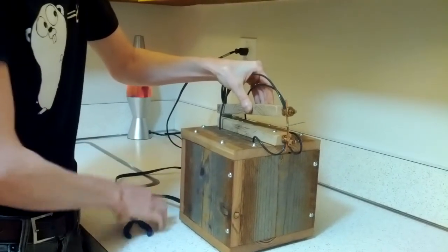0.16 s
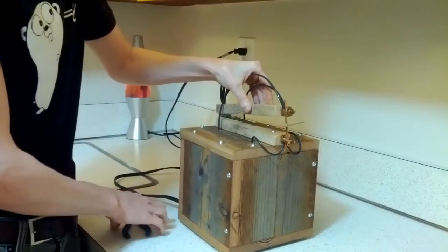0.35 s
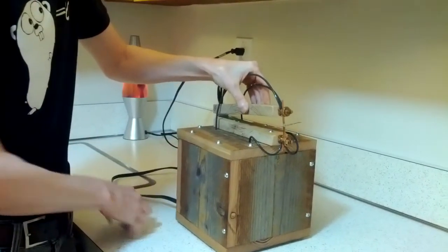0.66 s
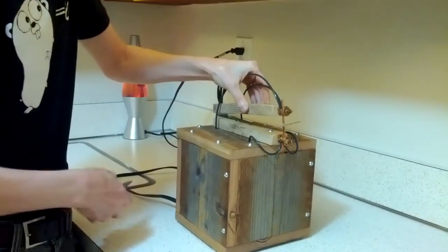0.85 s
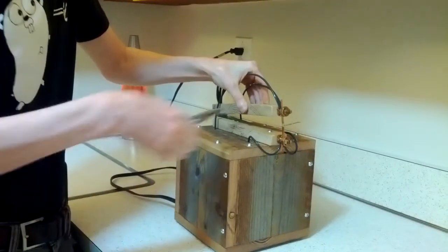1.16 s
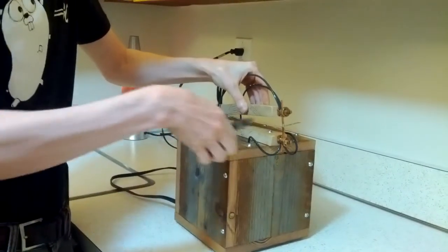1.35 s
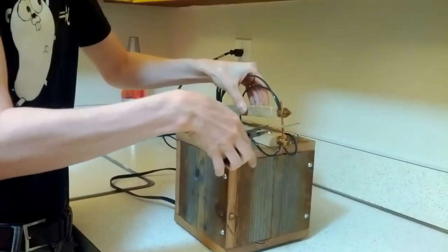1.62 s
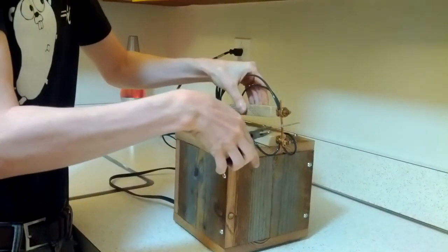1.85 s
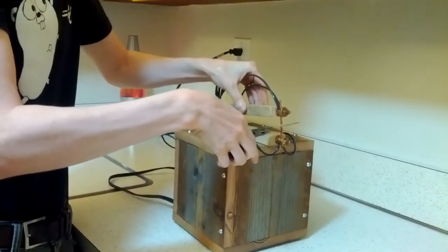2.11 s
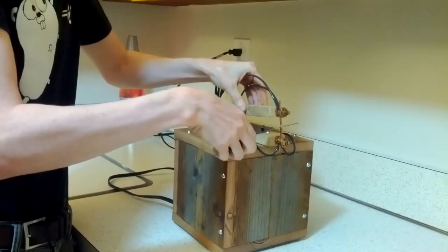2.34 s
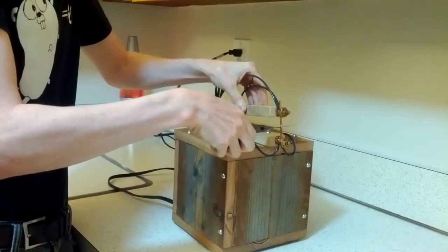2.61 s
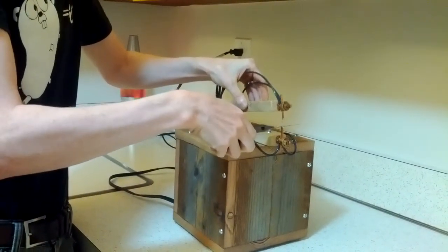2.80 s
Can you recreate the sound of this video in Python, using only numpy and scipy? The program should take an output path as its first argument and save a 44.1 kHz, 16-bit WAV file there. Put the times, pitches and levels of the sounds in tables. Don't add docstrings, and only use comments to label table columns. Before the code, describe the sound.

Sparse bright clicks of a hand tool in a small, quiet kitchen: a tick and scuff first, a crisp snap midway, metal rattling on wood later, soft thuds at the end, low hum and faint hiss throughout.

```python
import sys
import numpy as np
from scipy import signal
from scipy.fft import rfft, irfft
from scipy.io import wavfile
from scipy.ndimage import uniform_filter1d

SR = 44100
rng = np.random.default_rng(int(sys.argv[2]) if len(sys.argv) > 2 else 0)


def generate_wav(sig):
    pcm = np.round(np.clip(np.atleast_2d(sig).T, -1, 1) * 32767).astype(np.int16)
    wavfile.write(sys.argv[1], SR, pcm)


def convert_level_to_amplitude(level_db):
    exponent = np.asarray(level_db, float) / 20
    return 10 ** exponent


N = 130977

# frequency in Hz, density in dB per Hz.
AIR_COLOUR = [(15, -16), (70, -15.5), (170, -10.5), (450, -17.5), (1100, -22.5), (1800, -32), (6500, -43),
              (13000, -37)]
# frequency in Hz, width in Hz, level in dB.
ROOM_MODES = [(22.8, 3, -64), (90, 11, -65.5), (160.8, 14.5, -62.5), (181.1, 6.3, -62.5), (244.3, 22, -61),
              (273.1, 21.5, -64.5), (319.6, 80, -68), (465, 19.4, -64.5), (542, 26, -73),
              (644.7, 20, -73.5), (931, 43, -73), (1490, 45, -83.5)]
# frequency in Hz, rms level in dB.
HUM_TONES = [(120.5, -51), (50.8, -60.5)]
# multiple of the shaft rate, rms level in dB.
SHAFT_TONES = [(1, -62), (19, -83), (22, -74.5), (45, -88.5), (50, -90.5), (51, -99), (52, -96), (53, -95)]
# multiple of the slot rate, rms level in dB.
SLOT_TONES = [(6, -77.5), (7, -87.5), (8, -71), (9, -77.5)]
# start in seconds, length in seconds, rms level in dB.
SCUFF_STROKES = [
    (0.162, 0.058, -59.5),
    (0.304, 0.085, -60),
    (0.408, 0.049, -63),
    (0, 0.04, -61),
    (2.211, .03, -66),
    (2.788, 0.043, -83),
]
# frequency in Hz, gain in dB.
SCUFF_COLOUR = [(500, -2), (2200, 1), (4500, -5.5), (8000, -9), (14000, -4)]
# start in seconds, peak level in dB, centre in Hz, width in Hz.
TICK_EVENTS = [(0.1623, -34.5, 13300, 2530), (0.1623, -44, 7500, 3000), (0.169, -43, 13000, 1500),
               (0.184, -47.5, 14000, 3000), (0.214, -46, 12990, 3000), (0.18, -46, 4000, 1480),
               (0.334, -48, 7500, 3030), (0.75, -46, 7400, 2500), (0.7497, -47, 3200, 2500),
               (0.7555, -50, 7000, 2000), (0.758, -49, 3500, 2000), (1.4453, -37, 13200, 2980),
               (1.4451, -46.5, 7600, 2500), (1.4515, -44, 13000, 1200), (2.3022, -46.5, 4550, 2500),
               (1.483, -50, 13000, 4000), (2.7278, -37, 13200, 3000), (2.7281, -47.5, 8040, 2500),
               (2.734, -42, 14000, 2000), (2.766, -40, 13600, 4000)]
# peak level in dB, centre in Hz, width in Hz.
SNAP_LAYERS = [
    (-25, 11700, 2100),
    (-34.5, 7100, 2900),
    (-30.5, 3920, 1530),
]
# frequency in Hz, level in dB, 60 dB decay in seconds.
BOX_MODES = [(307, -4.5, 0.1), (330, 1, 0.072), (430, -12, 0.013), (551, -2.5, 0.024), (800, -7, .035),
             (1004, -5, 0.067), (1180, -6, 0.028), (1554, -4, 0.035), (1760, -11.5, 0.034),
             (2240, -11.5, 0.0698), (3000, -3.5, 0.02), (3400, -6.5, 0.017), (3890, -10.5, 0.011)]
# start in seconds, level in dB, best-rung frequency in Hz, spread in octaves.
BOX_KNOCKS = [
    (2.3185, -42.5, 740, 2.3),
    (2.3245, -40, 590, 2.75),
    (2.002, -52.5, 1500, 0.97),
    (3, -50.5, 1340, 0.86),
    (2.808, -50.5, 1000, 1.2),
    (0.1625, -52, 2240, .12),
    (0.178, -48, 2240, .2),
]
# start in seconds, peak level in dB, frequency in Hz,
# 60 dB decay in seconds.
COUNTER_THUDS = [
    (0.184, -40.5, 169.2, 0.2),
    (0.199, -38.5, 244, 0.087),
    (0.775, -38, 90, 0.13214),
    (0.808, -41, 90, 0.17),
    (1.443, -41.5, 85.78, 0.18),
    (2.794, -31, 120, 0.0731),
    (2.803, -39.5, 172, .1),
    (2.33, -47, 181.5, 1),
    (2.815, -37, 90, 0.174),
    (2.938, -36, 70, .12),
]
# frequency in Hz, level in dB, 60 dB decay in seconds.
STEEL_MODES = [(4200, -2, .005), (6530, -1, 0.011), (7560, -3.5, 0.0052), (8770, -3, 0.019),
               (9550, -3, .006), (10350, 0.5, .008), (11200, 0.5, 0.011), (12000, -3, 0.012),
               (12500, -2, 0.0082), (13200, -2, .006), (15000, -3, .008), (15200, -2, .009)]
# start in seconds, level in dB, best-rung frequency in Hz, spread in octaves.
STEEL_HITS_ON_TOOL = [
    (1.9935, -53, 11800, 0.33),
    (1.996, -53, 7300, 0.27),
    (2.3028, -44.5, 14300, 0.65),
    (2.3047, -41, 11800, 0.1),
    (2.3126, -55, 13050, .35),
    (2.3165, -52.5, 9600, .8),
    (2.323, -47.5, 9000, 0.24),
]
# frequency in Hz, 60 dB decay in seconds.
ECHO_DECAY = [(200, 0.23), (2000, 0.11), (6000, 0.17), (15000, 0.13)]
# delay in seconds, level in dB.
FIRST_REFLECTIONS = [(.0015, -31), (.0031, -16), (.0054, -18.5), (0.0104, -20)]


def evened(x):
    return x / np.sqrt(np.mean(x ** 2) + 1e-30)


def coloured(x, points):
    f, level_db = np.transpose(points)
    hz = np.fft.rfftfreq(len(x), 1 / SR)
    gain_db = np.interp(np.log(hz + 1), np.log(f + 1), level_db)
    return irfft(rfft(x) * convert_level_to_amplitude(gain_db), len(x))


def add(mix, s, sound):
    part = mix[round(s * SR):][:len(sound)]
    part += sound[:len(part)]


def drift(per_s):
    hz = np.fft.rfftfreq(N, 1 / SR)
    spectrum = rfft(rng.standard_normal(N)) / (1 + (hz / per_s) ** 2)
    return evened(irfft(spectrum, N))


def air():
    hz = np.fft.rfftfreq(N, 1 / SR)
    modes = 0
    for f, width, db in ROOM_MODES:
        modes = modes + convert_level_to_amplitude(db) ** 2 / (1 + (2 * (hz - f) / width) ** 2) ** 2 / width
    boom = irfft(rfft(rng.standard_normal(N)) * np.sqrt(modes * 2 * SR / np.pi), N)
    hiss = evened(coloured(rng.standard_normal(N), AIR_COLOUR))
    return convert_level_to_amplitude(-55) * hiss + boom


def tone(hz, db, wobble_db):
    level = np.sqrt(2) * convert_level_to_amplitude(db + wobble_db * drift(3.8))
    t = np.arange(N) / SR - 0.19
    return level * np.cos(2 * np.pi * hz * t)


def fridge():
    shaft_hz, slot_hz = 59.1, 1717
    slot_wander, slot_flutter_db = 0.0024, 3.5
    out = sum(tone(hz, db, 0.31) for hz, db in HUM_TONES)
    out = out + sum(tone(k * shaft_hz, db, 1.2) for k, db in SHAFT_TONES)
    turns = np.cumsum(slot_hz * (1 + slot_wander * drift(27.0))) / SR
    for k, db in SLOT_TONES:
        level = np.sqrt(2) * convert_level_to_amplitude(db + slot_flutter_db * drift(60.0))
        out = out + level * np.sin(2 * np.pi * k * turns)
    return out


def scuff(length, db):
    n = round(length * SR)
    slips_per_s = 2500
    slips = (rng.random(8000) < slips_per_s / SR) * rng.standard_normal(8000)
    stroke = np.sin(np.pi * (np.arange(n) / n) ** 0.55)
    return convert_level_to_amplitude(db) * evened(coloured(slips, SCUFF_COLOUR))[:n] * stroke


def tick(db, hz, width):
    t = np.arange(200) / SR
    shape = t * np.exp(-2 * np.pi * width * t) * np.sin(2 * np.pi * hz * t)
    return convert_level_to_amplitude(db) * shape / abs(shape).max()


def snap():
    return sum((-1) ** k * tick(*row) for k, row in enumerate(SNAP_LAYERS))


def struck(modes, contact_s, db, centre_hz, octaves):
    chatter, crack_db, crack_s = 3.9, 2, 0.0035
    hz, level_db, t60 = np.transpose(modes)[:, :, None]
    t = np.arange(8000) / SR
    luck = rng.standard_normal((len(modes), 2))
    shake = rng.standard_normal((len(modes), 600)) + 1j * rng.standard_normal((len(modes), 600))
    contact = (1 + chatter * shake) * np.exp(-t[:600] / contact_s)
    decay = np.exp(-np.log(1000) * t / np.clip(t60, .003, .1))
    swell = signal.fftconvolve(decay, contact, axes=1)[:, :len(t)]
    turns = hz * (1 + 0.0081 * luck[:, :1]) * t + luck[:, 1:]
    rings = (swell * np.exp(2j * np.pi * turns)).imag
    focus_db = level_db - np.minimum(10 * (np.log2(hz / centre_hz) / octaves) ** 2, 22.0)
    rung = (convert_level_to_amplitude(focus_db) * rings / abs(swell).max(axis=1, keepdims=True)).sum(axis=0)
    colour = [(hz[0, 0] / 2, -40), *zip(hz[:, 0], focus_db[:, 0]), (hz[-1, 0] * 2, -30)]
    crack = evened(coloured(rng.standard_normal(len(t)), colour)) * np.exp(-t / crack_s)
    return convert_level_to_amplitude(db) * (rung + convert_level_to_amplitude(crack_db + focus_db.max()) * crack)


def box_knock(db, centre_hz, octaves):
    return struck(BOX_MODES, 0.0015, db, centre_hz, octaves)


def thud(db, hz, t60):
    t = np.arange(12000) / SR
    rise_s = 0.0032
    return convert_level_to_amplitude(db - 60 * t / t60) * (1 - np.exp(-t / rise_s)) * np.sin(2 * np.pi * hz * t)


def steel_hit(db, centre_hz, octaves):
    return struck(STEEL_MODES, .0008, db, centre_hz, octaves)


def kitchen(x):
    hz, t, z = signal.stft(rng.standard_normal(SR // 2), SR, nperseg=128)
    f, t60 = np.transpose(ECHO_DECAY)
    fade = convert_level_to_amplitude(-60 * t / np.interp(hz, f, t60)[:, None])
    tail = signal.istft(z * fade, SR, nperseg=128)[1]
    tail = tail * np.minimum(np.arange(len(tail)) / (0.0021 * SR), 1)
    tail = convert_level_to_amplitude(-2) * tail / np.linalg.norm(tail)
    for s, db in FIRST_REFLECTIONS:
        add(tail, s, convert_level_to_amplitude(np.array([db])))
    return x + signal.fftconvolve(x, tail)[:N]


def below(x, edge_hz):
    return irfft(rfft(x) * (np.fft.rfftfreq(N, 1 / SR) < edge_hz), N)


def scene():
    hands, ticks, counter = np.zeros((3, N))
    for s, *row in SCUFF_STROKES:
        add(hands, s, scuff(*row))
    for s, *row in TICK_EVENTS:
        add(ticks, s, tick(*row))
    for s, *row in BOX_KNOCKS:
        add(hands, s, box_knock(*row))
    for s, *row in COUNTER_THUDS:
        add(counter, s, thud(*row))
    add(hands, 1.3682, snap())
    for s, *row in STEEL_HITS_ON_TOOL:
        add(hands, s, steel_hit(*row))
    wet = convert_level_to_amplitude(-6.5)
    handling = kitchen(hands + wet * ticks) + (1 - wet) * ticks
    return (handling + counter + air() + fridge())[None]


def band_limit(x):
    return signal.sosfilt(signal.butter(12, 16670, fs=SR, output="sos"), x)


def record(dry):
    low = below(dry, 15740)
    top = below(dry, 16560) - low
    loud = uniform_filter1d(top ** 2, size=256) > convert_level_to_amplitude(-65.5) ** 2
    gate = uniform_filter1d(loud * 1., size=256)
    return band_limit(low + top * gate)


dry = scene()
out = record(dry)
generate_wav(out)
```